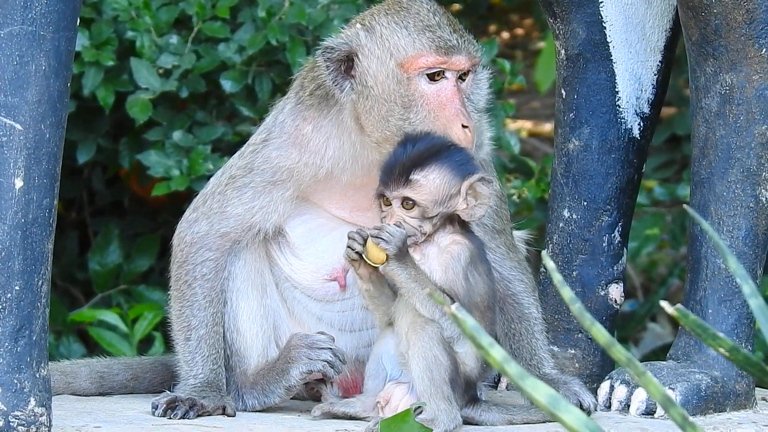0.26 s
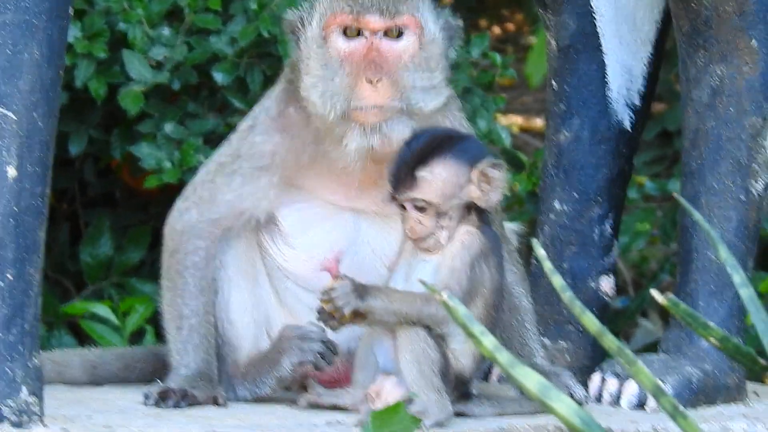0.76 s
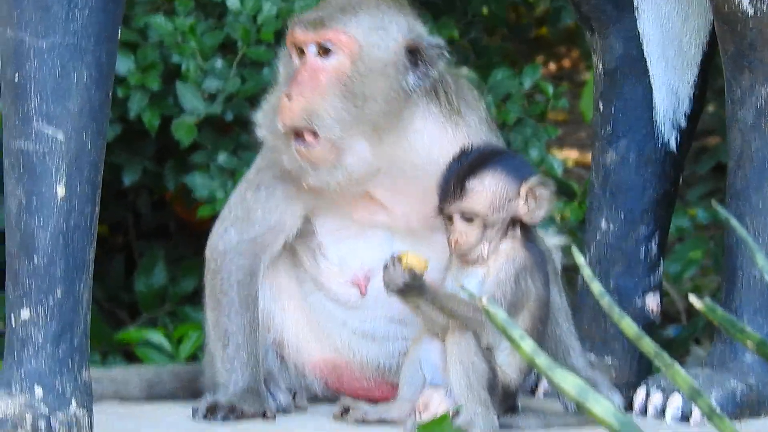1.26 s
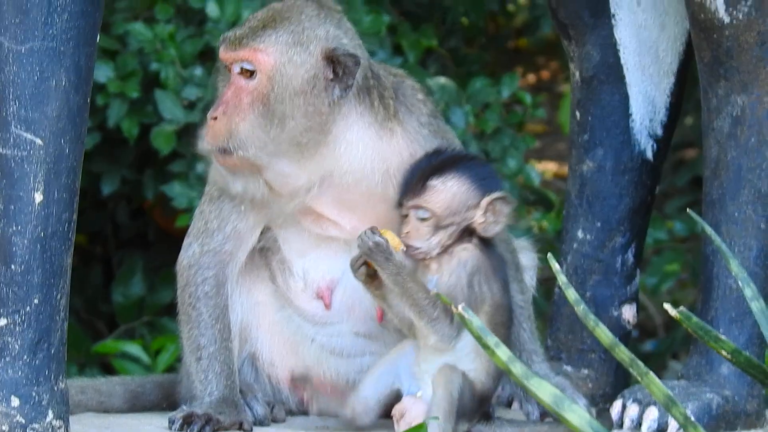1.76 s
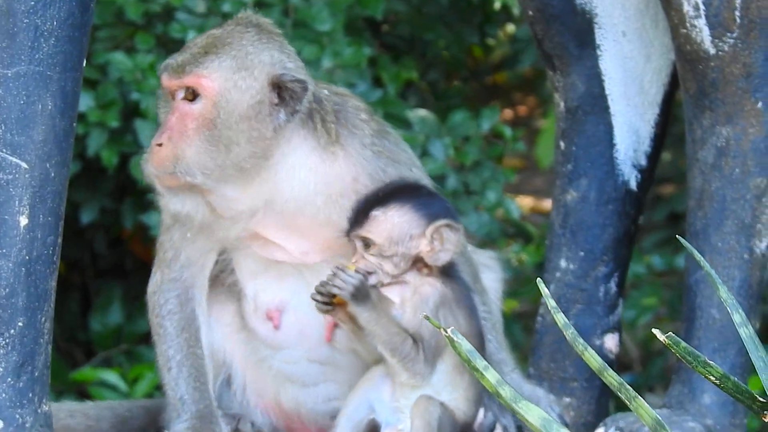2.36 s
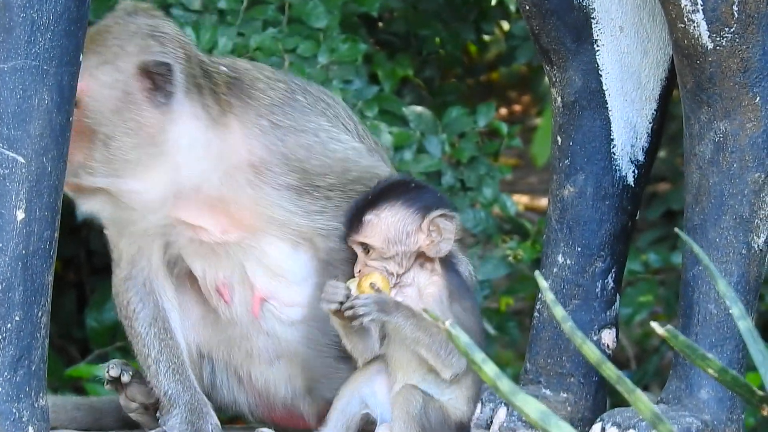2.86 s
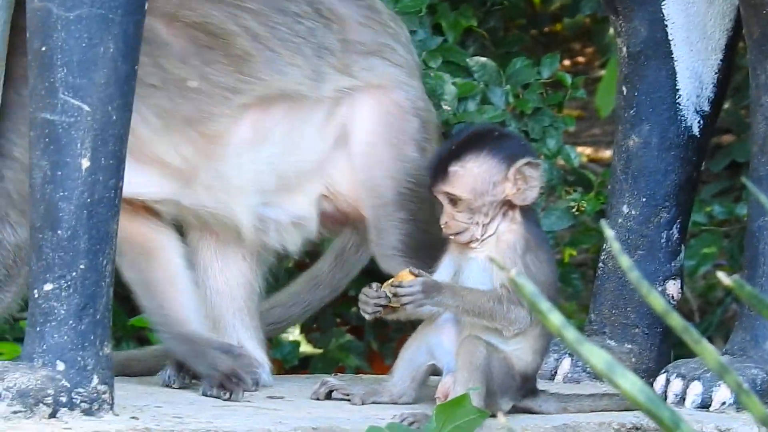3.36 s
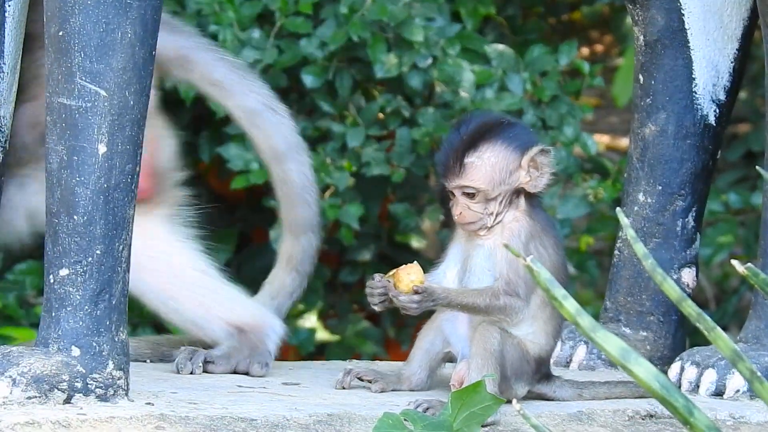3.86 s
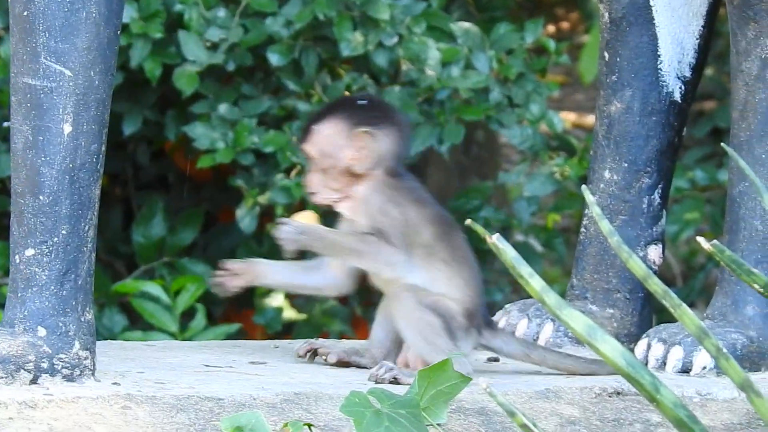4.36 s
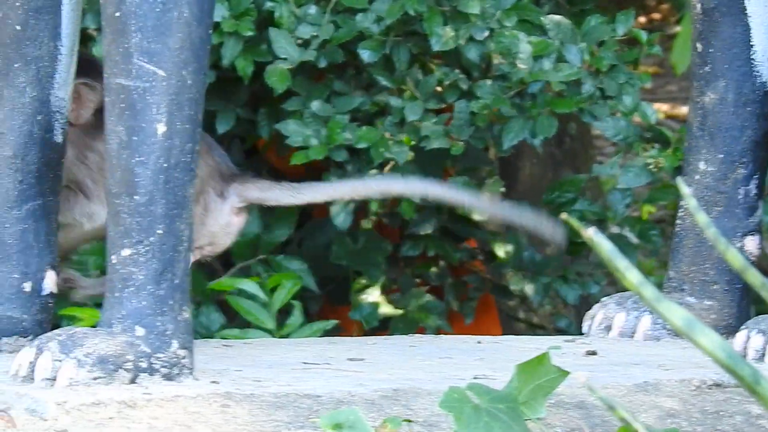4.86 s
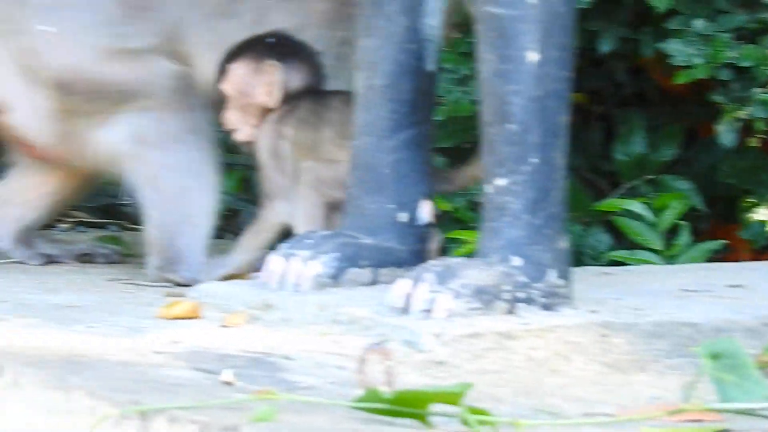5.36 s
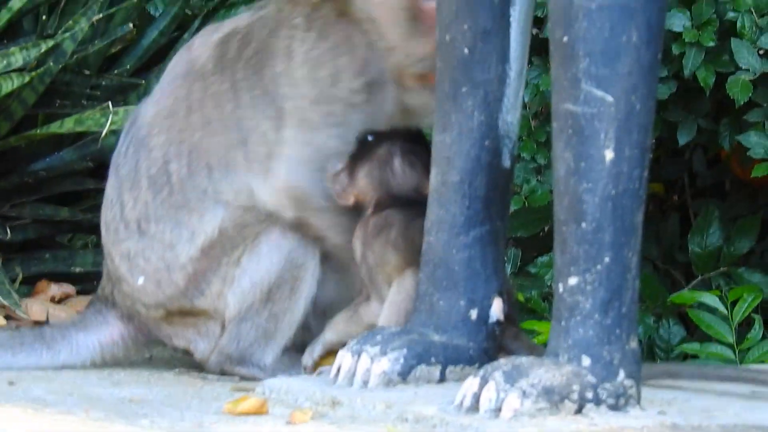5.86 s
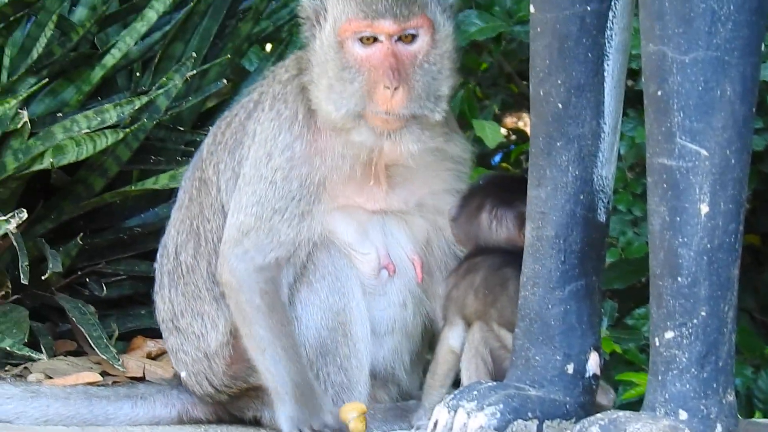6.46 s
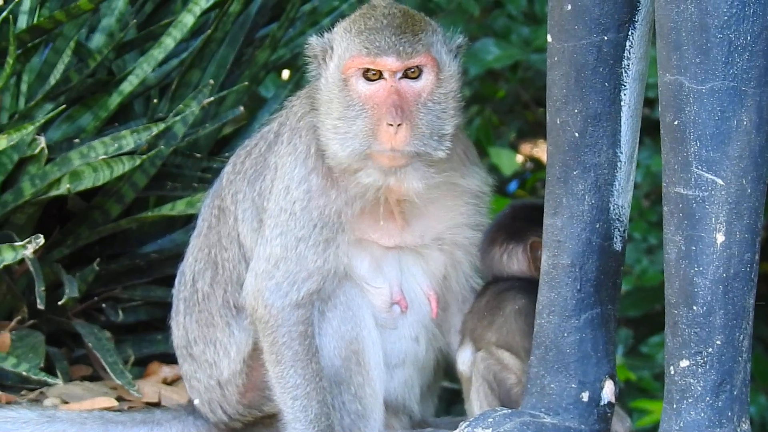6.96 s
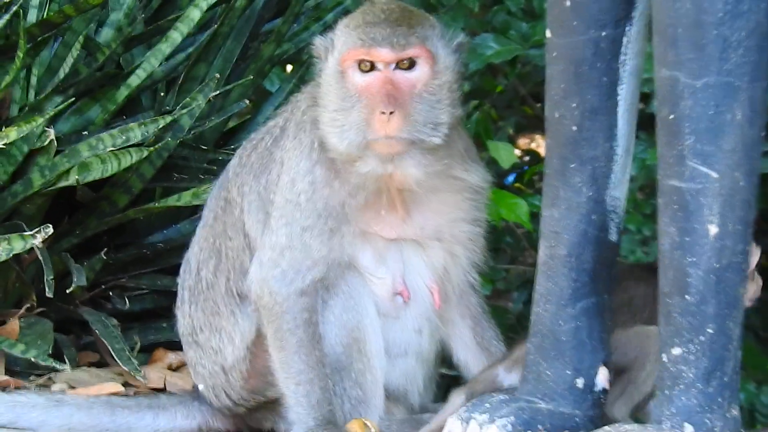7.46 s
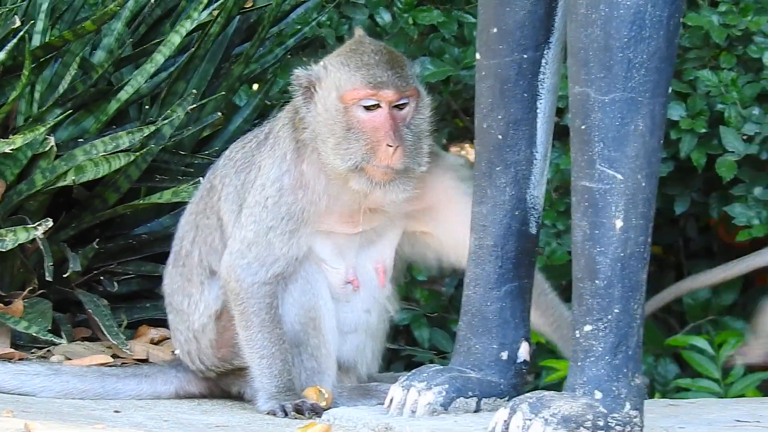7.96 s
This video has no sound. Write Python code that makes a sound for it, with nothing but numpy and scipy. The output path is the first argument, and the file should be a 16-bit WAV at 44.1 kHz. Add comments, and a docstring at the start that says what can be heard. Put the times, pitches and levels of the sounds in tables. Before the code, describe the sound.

A baby monkey coos softly, lets out a long piercing squeal, then sharp shrill cries, over outdoor hiss and a distant thudding engine.

```python
"""A yard with concrete, walls and bushes, where a baby macaque is left behind by its mother.
A pair of microphones hears coos, a long two-voiced squeal, a scuffle in dry leaves and shrill cries.
The voice is vocal-fold phase with roughness and noise; echoes and scattered noise throw it back.
Behind it, paired pulses make a one-cylinder engine thud in the distance, under a shaped-noise hiss.
At the end of the long squeal all sound drops out for a quarter of a second."""
import sys
import numpy as np
from scipy import signal
from scipy.fft import rfft, irfft, next_fast_len
from scipy.io import wavfile
from scipy.ndimage import uniform_filter1d

SR = 44100
rng = np.random.default_rng(int(sys.argv[2]) if len(sys.argv) > 2 else 0)


def store_pcm(level_fs):
    """Save levels as 16-bit WAV."""
    pcm = np.round(np.clip(level_fs, -1, 1) * 32767).astype(np.int16)
    wavfile.write(sys.argv[1], SR, np.atleast_2d(pcm).T)


N = 362061
TIME = np.arange(N) / SR


def undb(db):
    """Decibels to gain."""
    return 10 ** (np.asarray(db) / 20)


def unit(x):
    """Scale to rms 1."""
    return x / np.sqrt(np.mean(x ** 2) + 1e-20)


def curves(rows, t=TIME):
    """The columns of a table, joined by straight lines at times t."""
    s, *columns = np.transpose(rows)
    return [np.interp(t, s, c) for c in columns]


def filtered(x, points):
    """Filter x by (frequency [Hz], gain [dB]) points, joined along log frequency."""
    hz, db = np.transpose(points)
    size = next_fast_len(x.shape[-1])
    f = np.maximum(np.fft.rfftfreq(size, 1 / SR), 1)
    gain = undb(np.interp(np.log(f), np.log(hz), db))
    return irfft(rfft(x, size) * gain, size)[..., :x.shape[-1]]


def colour(x, points):
    """Filter x by (frequency [Hz], gain [dB]) points and bring it to rms 1."""
    return unit(filtered(x, points))


def waver(size, rate_hz):
    """Smooth random drift of spread 1, with little left above rate_hz."""
    f = np.fft.rfftfreq(next_fast_len(size + SR), 1 / SR)
    white = rng.standard_normal(2 * len(f) - 2)
    spectrum = rfft(white) / (1 + (f / rate_hz) ** 4)
    return unit(irfft(spectrum))[:size]


def stereo_noise(size, width):
    """Noise common to both sides plus a share that is opposite."""
    mid, side = rng.standard_normal((2, size))
    return unit(mid + width * side * np.array([[1], [-1]]))


def decay(t, t60):
    """Exponential decay that falls 60 dB in t60 seconds."""
    return np.exp(-np.log(1000) * t / t60)


def add(out, start, x):
    """Mix x into out from a start time on."""
    i = int(start * SR)
    x = x[..., :out.shape[-1] - i]
    out[..., i:i + x.shape[-1]] += x


def panned(x, pan_db):
    """Place x by its level difference, left minus right."""
    return x * undb(np.array([[pan_db], [-pan_db]]) / 2)


# spectrum of the outdoor hiss: (frequency [Hz], relative density [dB per Hz])
HISS_SPECTRUM = [(240, -5), (400, -4), (677, -2), (736, -1.5), (870, -1), (1120, -2), (1760, -4.5),
                 (3110, -7), (3730, -13.5), (4230, -7), (6590, -3.5), (7360, -8), (11000, -34.5),
                 (14300, -45.5), (22000, -120)]
# the hiss settles towards HISS_DB from a louder start, with a time constant in seconds
HISS_DB, HISS_EXTRA_DB, HISS_SETTLE_S = -43.5, 10, 5.12


def air(width=0.51, flicker_db=1.45, rumble_db=-53):
    """Gently stirring outdoor hiss, faint even microphone noise and a low rumble on each side."""
    hiss_db = HISS_DB + HISS_EXTRA_DB * np.exp(-TIME / HISS_SETTLE_S)
    hiss_db = hiss_db + flicker_db * waver(N, 4.5)
    hiss = undb(hiss_db) * colour(stereo_noise(N, width), HISS_SPECTRUM)
    microphone = undb(-68) * stereo_noise(N, .5)
    low = [(20, -28), (65, -12.5), (120, -4), (300, -16), (2000, -58.5)]
    rumble = undb(rumble_db) * colour(rng.standard_normal((2, N)), low)
    return hiss + microphone + rumble


# the distant engine moves away: (time [s], level [dB])
ENGINE_LEVEL = [(0, -30.5), (1, -27.5), (2.4, -37), (3.5, -37), (5, -40.5), (8.2, -48)]
# the engine eases off a little: (time [s], firing rate [firings per second])
FIRING_RATE = [(0, 16.92), (1, 16.87), (1.4, 16.3), (4.7, 16.3), (5.2, 16.15), (8.2, 16.09)]
# spectrum of the exhaust thuds: (frequency [Hz], relative density [dB per Hz])
EXHAUST_SPECTRUM = [(25, -39.5), (45, -17.5), (65, 1), (85, 0.5), (130, -6), (180, -5.5), (240, -10),
                    (320, -11), (600, -49), (3000, -90.5)]
# spectrum of the engine's far-off echoes: (frequency [Hz], relative density [dB per Hz])
ENGINE_ECHO_SPECTRUM = [(25, -41), (50, -11.5), (80, -1), (160, -1.5), (220, -3), (320, -15.5),
                        (600, -25.5), (3000, -79.5)]
FIRST_FIRING_S = .047
# echo level at its loudest, and the share of the engine's fading that it follows
ENGINE_ECHO_DB, ENGINE_ECHO_FOLLOW = -33, 0.48


def engine(lead_s=0.00768, lead_db=-5, swing_s=0.00347, scatter_db=1, echo_t60=0.23, loose=0.77):
    """Each firing is a double thud of the exhaust; far-off echoes repeat with it and blur the beat."""
    rate, = curves(FIRING_RATE)
    direct_db, = curves(ENGINE_LEVEL)
    echo_db = ENGINE_ECHO_DB + ENGINE_ECHO_FOLLOW * (direct_db - direct_db.max())
    # one pulse each time the count of firings passes a whole number
    turns = np.cumsum(rate) / SR - FIRST_FIRING_S * rate[0]
    count = np.floor(turns)
    firings = np.diff(count, prepend=count[0]) * undb(scatter_db * waver(N, 5.4))
    # a weaker puff leads each firing, and the pressure swings back after each puff
    puffs = firings + undb(lead_db) * np.roll(firings, -int(lead_s * SR))
    thuds = colour(puffs - np.roll(puffs, int(swing_s * SR)), EXHAUST_SPECTRUM)
    echoes = 0
    for _ in range(4):  # the shares of four sets of echo paths drift slowly at random
        paths = rng.standard_normal(SR) * decay(TIME[:SR], echo_t60)
        share = np.sin(2 * waver(N, .6))
        echoes = echoes + signal.fftconvolve(firings, paths)[:N] * share
    # noise without the beat loosens the echoes
    throb = colour(unit(echoes) + loose * stereo_noise(N, 0.11), ENGINE_ECHO_SPECTRUM)
    return undb(direct_db) * thuds + undb(echo_db) * throb


# the dash through dry leaves: (time [s], rustle level [dB], footfall level [dB])
DASH = [(5.42, -48, -74), (5.50, -39.5, -33.5), (5.55, -23.5, -27), (5.58, -23.5, -28.5), (5.62, -26, -44),
        (5.68, -33, -48), (5.80, -38.5, -65)]
# spectrum of the dry leaves: (frequency [Hz], relative density [dB per Hz])
LEAF_SPECTRUM = [(300, -27), (600, -6.5), (1500, -5.5), (3500, -8), (5000, -0.5), (6500, 5), (8000, -1.5),
                 (11000, -29), (15000, -41)]
# spectrum of the feet: (frequency [Hz], relative density [dB per Hz])
FOOT_SPECTRUM = [(100, -28.5), (180, -8), (225, 4), (265, -11), (305, 6), (400, -22.5), (600, -8.5),
                 (1200, -43)]


def scuffle(crackle_db=3, fade_s=.03):
    """Leaves crackle as noise of uneven level over the dull patter of feet."""
    rustle_db, foot_db = curves(DASH)
    inside = np.minimum(TIME - DASH[0][0], DASH[-1][0] - TIME)
    active = np.clip(inside / fade_s + 1, 0, 1)
    crackle = undb(crackle_db * waver(N, 290))
    leaves = colour(stereo_noise(N, 0.258) * crackle, LEAF_SPECTRUM)
    feet = colour(stereo_noise(N, 0.053), FOOT_SPECTRUM)
    return active * (undb(rustle_db) * leaves + undb(foot_db) * feet)


# paws and food knocking on the concrete:
# (time [s], level [dB], ring frequency [Hz], decay time to -60 dB [s])
KNOCKS = [(.736, -27.5, 1770, 0.12), (3.444, -30.5, 1317, 0.051), (3.859, -18, 1089, 0.031),
          (4.215, -34, 809, 0.33), (4.351, -26, 965, 0.073), (7.215, -31, 4830, .03),
          (7.471, -33.5, 1090, 0.064), (7.926, -31, 980, 0.051)]


def taps(ring=0.72, click_db=-15, top_db=-55):
    """Short dull knocks: a noise burst in one broad resonance with a weak click above it."""
    out, t = np.zeros((2, N)), TIME[:SR // 4]
    for start, db, hz, t60 in KNOCKS:
        body = [(hz / 5, -22), (hz * ring / 2 + hz / 5, -6), (hz, 0),
                (hz * 2, click_db), (9500, click_db - 36), (13000, top_db)]
        onset = np.minimum(t / 0.00029, 1)
        knock = colour(stereo_noise(len(t), 0.29), body) * decay(t, t60) * onset
        add(out, start, undb(db) * knock)
    return out


# first echoes off floor, statue and walls: (delay [s], left level [dB], right level [dB])
FIRST_ECHOES = [(.0034, -8, -27), (0.0153, -19, -8.5), (0.029, -11.5, -13.5)]


def yard(x, near_db=-10, near_t60=0.42, far_db=-21, far_t60=0.74, build=0.021):
    """A few distinct echoes, then scatter from bushes near and far, which swallow the top treble."""
    t = TIME[:SR]
    response = np.zeros((2, SR))
    bushes = [(500, -39.5), (3000, -3.0), (6500, 1), (9000, 1.0), (14000, -4.0)]
    for db, t60 in [(near_db, near_t60), (far_db, far_t60)]:
        scatter = colour(stereo_noise(SR, 0.36), bushes)
        tail = scatter * decay(t, t60) * (1 - np.exp(-t / build))
        response += undb(db) * unit(tail) / np.sqrt(SR)
    for delay, *db in FIRST_ECHOES:
        response[:, int(delay * SR)] += undb(db)
    return signal.fftconvolve(x[None], response, axes=1)[:, :N]


def span(start, end, attack, release):
    """The times that a call covers, and a gate with soft edges."""
    t = np.arange(start, end, 1 / SR)
    return t, np.clip(np.minimum((t - start) / attack, (end - t) / release), 0, 1)


def folds(hz, rough, jitter=0.03, jitter_hz=600, tremor=0.0036, strain=0.067):
    """Phase of the vocal folds: a tremor that grows with strain, and fast jitter."""
    shiver = (tremor + strain * np.minimum(rough, .25)) * waver(len(hz), 90)
    pitch = hz * (1 + shiver + jitter * rough * waver(len(hz), jitter_hz))
    return 2 * np.pi * np.cumsum(pitch) / SR


def skirt(phase, width_hz):
    """A band of noise that follows the pitch."""
    return waver(len(phase), width_hz) * np.sin(phase) + waver(len(phase), width_hz) * np.cos(phase)


def whistle(hz, db, rough, overtone_db=-25, overtone_top_hz=14800, overtone_fade_hz=5000,
            husk_db=4, husk_hz=600, rasp_db=-1, rasp_hz=2200, flutter=0.31, hiss_db=-13):
    """A near-pure whistle that turns husky, then breaks up into a wide rasp as roughness rises."""
    rough = np.clip(rough, 0, 1)
    phase = folds(hz, rough)
    overtone_fade = np.clip((overtone_top_hz - 2 * hz) / overtone_fade_hz, 0, 1)
    overtone = undb(overtone_db) * np.sin(2 * phase) * overtone_fade
    clear = (1 - rough) * (np.sin(phase) + overtone)
    husk = undb(husk_db) * rough * (1 - rough) * skirt(phase, husk_hz)
    wide_rasp = undb(rasp_db) * rough ** 2.0 * skirt(phase, rasp_hz)
    # turbulence in the open mouth spreads far to both sides of the pitch
    mouth = [(1800, -24.5), (3200, 4), (6000, 10), (11500, -2), (15000, -36)]
    hiss = undb(hiss_db) * rough * colour(rng.standard_normal(len(hz)), mouth)
    shake = 1 + flutter * np.sqrt(rough) * waver(len(hz), 180)
    return np.sqrt(2) * (clear + husk + wide_rasp + hiss) * shake * undb(db)


# spectrum of a coo leaving the mouth:
# (opening [0-1], harmonic 1 level [dB], harmonic 2 level [dB], harmonic 4 level [dB])
MOUTH_COLOUR = [(0, 1.5, -21, -34), (.4, -1.5, -4.5, -16), (.7, -10, -1, -12), (1, -6, -2.5, -2.5)]


def coo(rows, gain_db=-1, edge_s=.012):
    """A low call of three harmonics, brighter as the mouth opens, hoarser as it is pushed louder."""
    t, gate = span(rows[0][0] - edge_s / 2, rows[-1][0] + edge_s / 2, edge_s, edge_s)
    hz, db, opening = curves(rows, t)
    rough = np.clip((db + 32) / 20, .01, .5)
    phase = folds(hz, rough, tremor=0.0016)
    voice = 0
    for harmonic, mouth_db in zip((1, 2, 4), curves(MOUTH_COLOUR, opening)):
        voice = voice + undb(db + gain_db + mouth_db) * np.sin(harmonic * phase)
    return t[0], np.sqrt(2) * voice * gate * (1 + rough * waver(len(t), 400))


CRY_ATTACK_S, CRY_RELEASE_S = 0.0027, 0.0086
CRY_LATE_BEND = 1.35  # above 1, the pitch holds at first and bends faster towards the end


def cry(start, length, first_hz, middle_hz, last_hz, db, swell_db, rough):
    """A short cry or part of one: the pitch bends through one arc, the level swells or fades evenly."""
    t, gate = span(start, start + length, CRY_ATTACK_S, CRY_RELEASE_S)
    along = (t - start) / length
    arc = np.polyfit([0, .5, 1], [first_hz, middle_hz, last_hz], 2)
    hz = np.polyval(arc, along ** CRY_LATE_BEND)
    return start, gate * whistle(hz, db + swell_db * (along - .5), rough)


RASP_HZ, RASP_ROUGHNESS = 7060, 0.71


def rasp(start, length, db):
    """Harsh sound, so rough that hardly any pitch is left."""
    return cry(start, length, RASP_HZ, RASP_HZ, RASP_HZ, db, 0, RASP_ROUGHNESS)


# the long squeal shoots up to a thin whistle and comes down again: (time [s], pitch [Hz])
SQUEAL_PITCH = [(3.988, 4400), (4.006, 7200), (4.03, 13300), (4.219, 14300), (4.32, 13200), (4.42, 14500),
                (4.47, 12900), (4.521, 14000), (4.7, 15450), (4.93, 15300), (4.98, 14100), (5.049, 10680),
                (5.115, 9260), (5.129, 7000), (5.148, 6200)]
# loudest at the mouth resonance; harsh at and below it, clear far above
MOUTH_HZ, MOUTH_DB, FALL_DB_PER_OCTAVE, WHISTLE_DB = 7100, -9.5, 32, -42
HARSH_ROUGHNESS, WHISTLE_ROUGHNESS, HARSH_OCTAVES = .72, .15, .33
FALTER_DB, FALTER_HZ = 4.5, 22  # the clear whistle comes and goes


def squeal():
    """The long squeal: distance from the mouth resonance sets its level, height above it its clarity."""
    t, gate = span(SQUEAL_PITCH[0][0], SQUEAL_PITCH[-1][0], CRY_ATTACK_S, CRY_RELEASE_S)
    hz, = curves(SQUEAL_PITCH, t)
    octaves = np.log2(hz / MOUTH_HZ)
    harsh = np.exp(-(np.maximum(octaves, 0) / HARSH_OCTAVES) ** 2)
    db = np.maximum(MOUTH_DB - FALL_DB_PER_OCTAVE * np.abs(octaves), WHISTLE_DB)
    falter_db = FALTER_DB * (1 - harsh) * waver(len(t), FALTER_HZ)
    rough = WHISTLE_ROUGHNESS + (HARSH_ROUGHNESS - WHISTLE_ROUGHNESS) * harsh
    return t[0], gate * whistle(hz, db + falter_db, rough)


# the lower voice of the voice box, which warbles along with the whistle:
# (time [s], pitch [Hz], level [dB])
LOWER_VOICE = [(4.1, 4495, -43), (4.34, 4410, -49.5), (4.391, 3610, -40.5), (4.461, 4550, -38),
               (4.53, 3800, -38.5), (4.61, 5000, -38), (4.71, 3520, -41.5), (4.8, 3875, -40.5),
               (4.855, 5394, -38.5), (4.88, 4020, -43), (4.905, 5200, -35), (4.958, 3774, -36.5),
               (4.985, 4400, -27.5)]
WARBLE, WARBLE_HZ, UNDERVOICE_ROUGHNESS = 0.033, 21.3, .18  # warble is a share of the pitch


def undervoice(octave_db=-7, beat_db=-6, hiss_db=0, edge_s=.02):
    """A second, unsteady oscillation, with a tone at the distance between it and the whistle."""
    t, gate = span(LOWER_VOICE[0][0], LOWER_VOICE[-1][0], edge_s, CRY_RELEASE_S)
    hz, db = curves(LOWER_VOICE, t)
    warbling_hz = hz * (1 + WARBLE * waver(len(t), WARBLE_HZ))
    low = folds(warbling_hz, UNDERVOICE_ROUGHNESS, jitter=.22, tremor=.015)
    high = folds(curves(SQUEAL_PITCH, t)[0], UNDERVOICE_ROUGHNESS)
    tones = np.sin(low) + undb(octave_db) * np.sin(2 * low) + undb(beat_db) * np.sin(high - low)
    bursts = unit(undb(4.5 * waver(len(t), 45)))
    breath = [(2500, -12.5), (4500, 1.0), (6800, 6), (9000, -10), (14000, -9.5)]
    hiss = undb(hiss_db) * colour(rng.standard_normal(len(t)), breath)
    return t[0], (np.sqrt(2) * tones * bursts + hiss) * gate * undb(db)


# coos, one table each: (time [s], pitch [Hz], level [dB] before the coo's own gain, mouth opening [0-1])
COO_CALLS = [
    [(1.228, 1570, -41.5, 0.1), (1.35, 1620, -33, 0.22), (1.38, 1530, -41, 0.4), (1.455, 1602, -33, 0),
     (1.52, 1626, -42.5, 0.96), (1.74, 1614, -32.5, 0.8), (1.85, 1597, -31, 0.32), (2.2, 1633, -35, 0.95),
     (2.33, 1628, -38, 0.61), (2.39, 1588, -41, 0)],
    [(7.77, 1710, -33, 0.6), (7.788, 1615, -21.5, 0.75), (7.812, 1472, -30, .7)],
]
# harsh noise within the squeal: the first row an echo of its loud onset, then two bursts:
# (start [s], length [s], level [dB])
RASP_ROWS = [(4.014, .04, -19), (4.976, .024, -23.5), (5.034, 0.016, -18.5)]
# short cries and parts of cries, each one arc of pitch; 6.617 breaks into a harsher note at 6.653:
# (start [s], length [s], first pitch [Hz], middle pitch [Hz],
# last pitch [Hz], level [dB], swell [dB], roughness [0-1], left minus right [dB])
CRY_ROWS = [(3.984, 0.027, 1750, 2730, 3400, -30.5, 15, 0.13, 6),
            (5.079, 0.033, 9980, 9900, 9350, -21, 0, .05, 0.5),
            (5.113, 0.026, 4940, 4400, 4230, -26.5, -3, 0.37, 0),
            (5.436, 0.099, 7873, 9600, 10700, -35.5, -10, 0.42, -1),
            (5.642, 0.078, 7180, 5990, 5760, -20.5, 0, 0.28, -1.5),
            (5.99, 0.083, 2645, 3350, 3380, -46.5, 1, 0.2, 5),
            (6.278, .026, 6440, 6205, 4970, -7.5, 0, 0.1, 1),
            (6.329, 0.06, 6590, 6720, 5000, -12, -1, 0.11, -1),
            (6.617, 0.037, 5740, 6080, 5820, -12.5, 6, 0.08, -3.5),
            (6.653, 0.062, 6380, 7700, 7750, -19.5, -22, 0.37, -2),
            (7.545, 0.042, 7650, 7870, 8230, -29, -1.5, 0.65, -1),
            (7.581, 0.028, 2716, 2534, 2850, -24.5, 4, 0.07, 3),
            (7.582, 0.039, 7400, 6670, 6460, -18, 2, 0.66, -1),
            (7.619, .124, 5395, 5700, 4360, -13, -9, 0.11, -2)]
SQUEAL_PAN_DB, COO_PAN_DB = 1, -5.5  # left minus right


def baby():
    """The baby's whole voice, placed left or right and answered by the yard."""
    calls = [(coo(rows), COO_PAN_DB) for rows in COO_CALLS]
    long_squeal = [squeal(), undervoice()] + [rasp(*row) for row in RASP_ROWS]
    calls += [(call, SQUEAL_PAN_DB) for call in long_squeal]
    calls += [(cry(*row), pan_db) for *row, pan_db in CRY_ROWS]
    voice, direct = np.zeros(N), np.zeros((2, N))
    for (start, call), pan_db in calls:
        add(voice, start, call)
        add(direct, start, panned(call, pan_db))
    return direct + yard(voice)


def scene():
    """Hiss and distant engine behind the scuffle, the knocks and the baby's voice."""
    return air() + engine() + scuffle() + taps() + baby()


# how much the microphone pair widens each part of the spectrum:
# (frequency [Hz], gain of the side signal [dB])
PAIR_WIDTH = [(200, -5.5), (700, -5), (2500, -2.5), (6000, 3), (14000, 9)]


def widen(x):
    """The two microphones differ more in the treble: the side signal is filtered."""
    mid, side = (x[0] + x[1]) / 2, (x[0] - x[1]) / 2
    side = filtered(side, PAIR_WIDTH)
    return np.array([mid + side, mid - side])


# the brief silence: (start [s], end [s])
SILENCE = (5.147, 5.393)
TOP_HZ = 15700


def record(dry):
    """Everything drops out briefly; peaks are clipped at full scale, then the top is cut."""
    sounding = 1. * ((TIME < SILENCE[0]) | (TIME > SILENCE[1]))
    live = uniform_filter1d(sounding, size=64)  # softens the edges of the silence
    clipped = np.clip(widen(dry) * live, -1, 1)
    top_cut = signal.ellip(10, .2, 70, TOP_HZ, fs=SR, output="sos")
    return signal.sosfilt(top_cut, clipped)


dry = scene()
out = record(dry)
store_pcm(out)
```